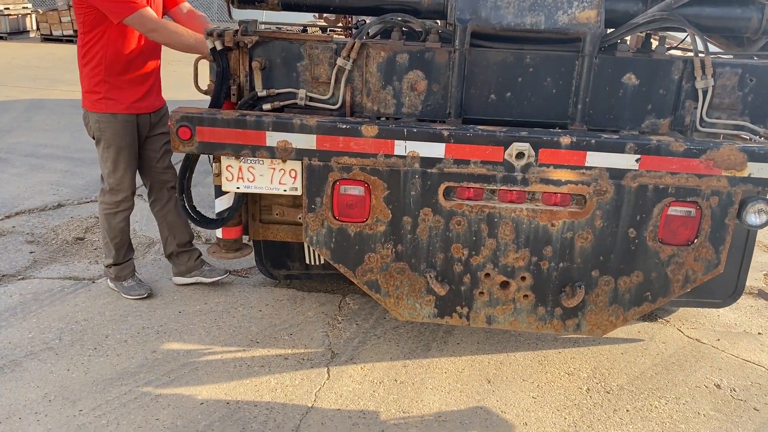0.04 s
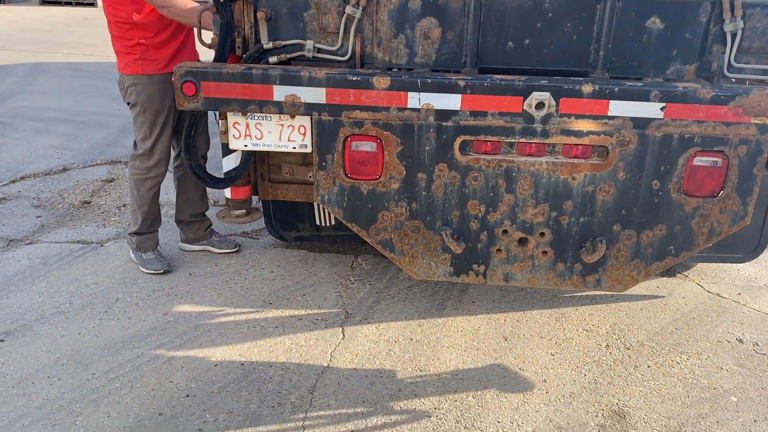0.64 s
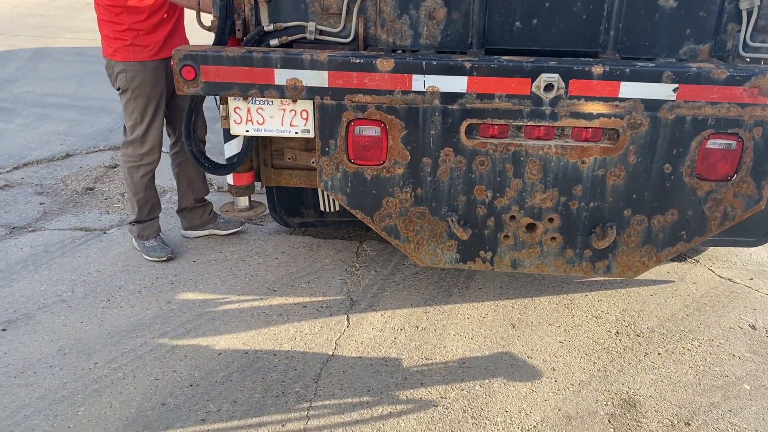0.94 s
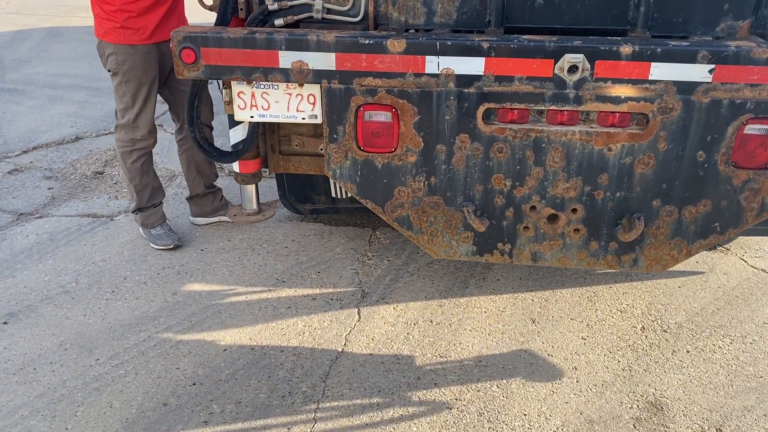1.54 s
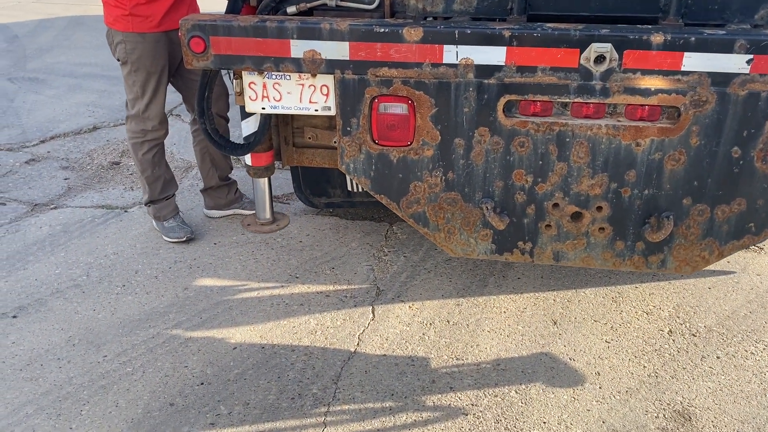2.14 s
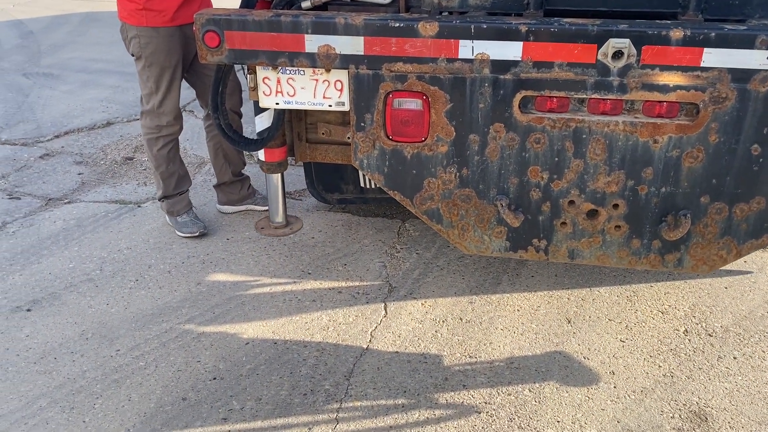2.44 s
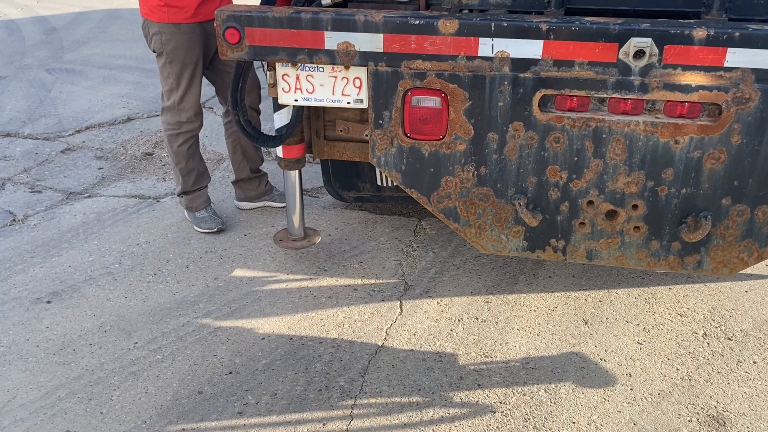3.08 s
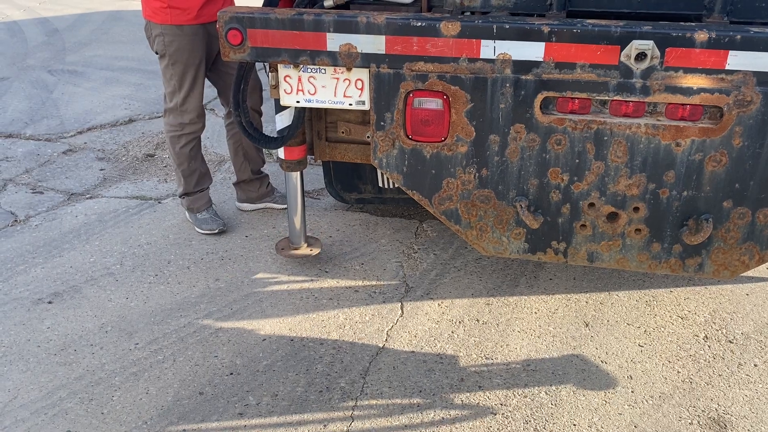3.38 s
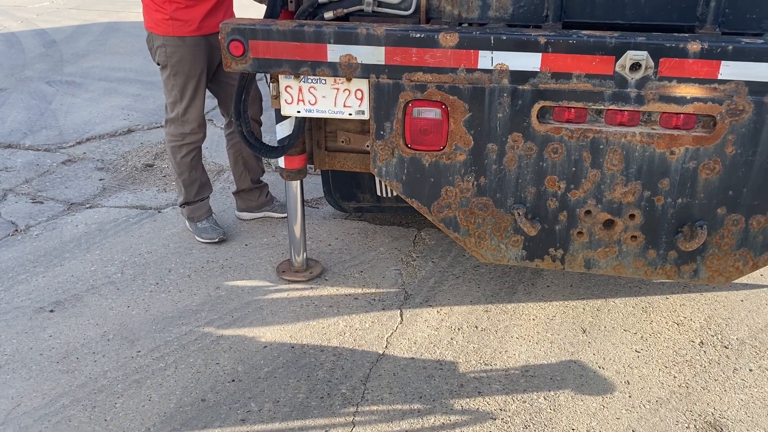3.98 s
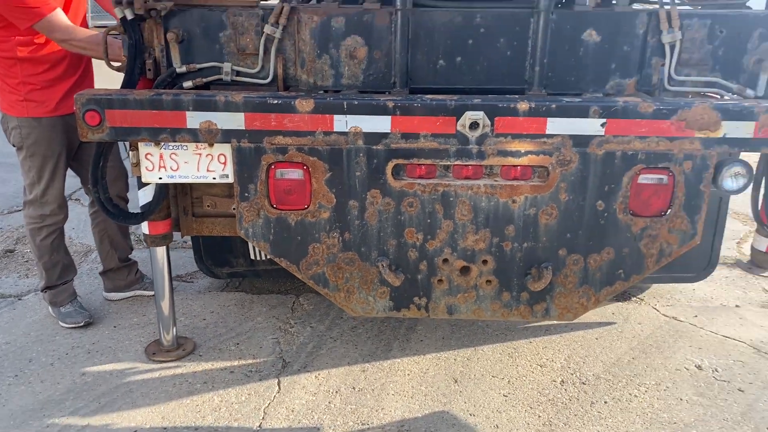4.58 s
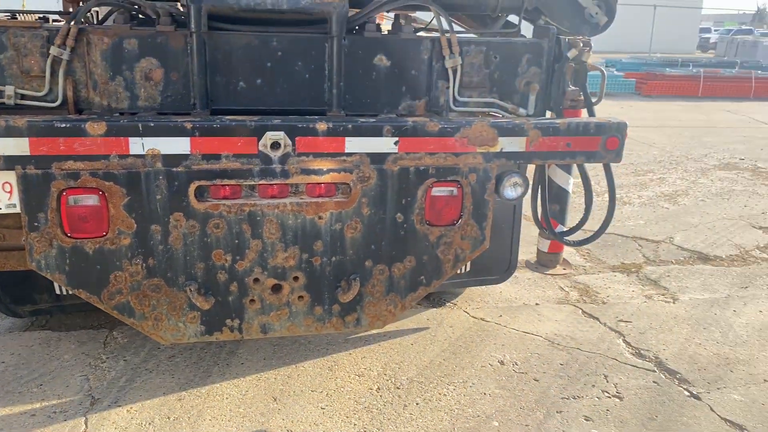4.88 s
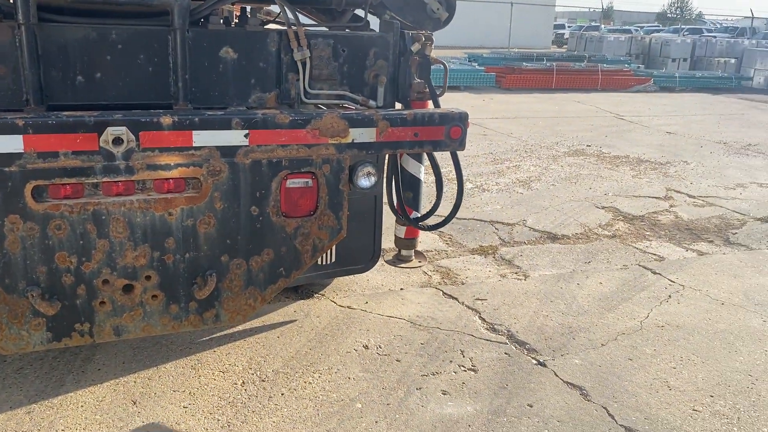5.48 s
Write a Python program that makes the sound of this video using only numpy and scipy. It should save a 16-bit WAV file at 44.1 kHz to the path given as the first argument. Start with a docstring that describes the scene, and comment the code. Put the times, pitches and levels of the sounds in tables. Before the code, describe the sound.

A diesel truck idles outdoors while hydraulics hum, whistle and squeal, raising a steel outrigger leg that clunks home.

```python
"""A six-cylinder diesel truck idles on an open concrete yard, a stereo microphone standing behind it.
The tailpipe puffs, the block drones and clatters, and the crane's outrigger leg is pulled up:
the gear pump hums under load while oil whistles, squeals and hisses through the control valve.
The microphone comes close to the leg's side; the steel leg clunks home and the valve squeals shut.
The microphone draws back, the unloaded pump whines and the engine idles on."""
import sys
import numpy as np
from scipy import signal
from scipy.fft import rfft, irfft, next_fast_len
from scipy.io import wavfile
from scipy.ndimage import uniform_filter1d, map_coordinates

SR = 44100
rng = np.random.default_rng(int(sys.argv[2]) if len(sys.argv) > 2 else 0)


def store_wav(level_fs):
    """Save 16-bit WAV to argv[1]."""
    pcm = np.round(np.clip(np.atleast_2d(level_fs), -1, 1) * 32767)
    wavfile.write(sys.argv[1], SR, pcm.T.astype(np.int16))


N = 243431
TIME = np.arange(N) / SR
BINS = np.fft.rfftfreq(N, 1 / SR)
OPEN_S, SHUT_S = 0.54, 4.51  # the lever holds the valve open while the leg rises
TEETH_PER_FIRING = 2.452  # the pump is geared to the engine

# engine speed: [t/s, firing rate/Hz]
FIRING_RATE = [(0, 60.05), (.5, 59.95), (.85, 59.75), (3.5, 59.9), (4.3, 59.8), (4.7, 60.05), (5.5, 60.1)]
# exhaust note: [multiple of the four-stroke cycle, relative level/dB]
EXHAUST_ORDERS = [(4, -56), (5, -43), (6, -20), (7, -35), (8, -34.5), (9, -32), (11, -52.5), (12, -32),
                  (14, -43), (18, -36), (20, -43.5), (22, -42), (24, -41)]
# the tailpipe as it reaches the microphone: [t/s, gain/dB]
TAILPIPE_GAIN = [(0, -1.5), (1.1, -1), (2.2, -0.7), (3.2, -0.6), (4.1, 0.5), (4.6, -1.3), (5.3, -2)]
# spectrum of the block's drone: [f/Hz, relative level/dB]
DRONE_SPECTRUM = [(20, -33), (45, 5.5), (100, 6.5), (170, 4.5), (260, 3.5), (380, -5.5), (500, -0.5),
                  (650, -6), (820, -3), (1100, -6), (1500, -11), (2200, -25), (5000, -34.5)]
# spectrum of the diesel clatter: [f/Hz, relative level/dB]
CLATTER_SPECTRUM = [(500, -55), (1500, -9.5), (1900, -7.5), (2400, -4), (2800, -2), (3100, -0.5),
                    (3500, -5), (4500, -15), (5600, -12), (8200, -17.5), (11000, -19.5), (12500, -22),
                    (15500, -60)]
# engine treble at the microphone: [t/s, clatter level/dB, covers level/dB]
ENGINE_TREBLE = [(0, -37, -37.5), (.6, -34, -36.5), (1.7, -35, -35.5), (2.45, -36, -33.5),
                 (3.6, -35, -36.5), (4.45, -35, -34.5), (5.15, -41, -40.5), (5.52, -39.5, -34.5)]
# ringing engine covers: [f/Hz, width/Hz, relative level far/dB, relative level close/dB]
COVER_MODES = [(1734, 51, 3, -2), (1815, 40, -2.5, 1.5), (1986, 240, -5, -4), (2120, 53, -0.5, -4.5),
               (2196, 59, -4, 0.5), (2710, 128, -5, -4.5), (4110, 51, -7.5, -9.5)]
# belt-driven parts: [f/Hz, level far/dB, level close/dB]
BELT_TONES = [(319.5, -48, -48), (628.6, -50, -45.5), (813, -49, -43)]
# swells of a narrow whine: [start/s, end/s, level/dB]
WHINE_SWELLS = [(.7, 1.05, -46), (1.53, 1.78, -42.5), (2.8, 3.55, -40), (4.64, 5.05, -39.5)]
# pump hum: [multiple of the tooth rate, relative level/dB, left minus right/dB]
PUMP_HARMONICS = [(1, -41.5, 1), (2, -33, -1), (3, -51, 2), (4, -52, -2), (5, -37, 5.5)]

# the valve's main whistle while the leg travels: [t/s, f/Hz, relative level/dB, octave/dB]
MAIN_JET = [(0.93, 5680, -37, -46), (.98, 5630, -35.5, -46), (1.12, 5635, -37, -48), (1.2, 5710, -43, -41),
            (1.3, 5790, -50, -39.5), (1.37, 5910, -41, -51), (1.54, 5950, -36.5, -43.5),
            (1.94, 5890, -37.5, -44), (1.96, 6030, -38, -44), (1.99, 5975, -35, -40),
            (2.35, 5965, -34.5, -38.5), (2.49, 5890, -38, -40), (2.58, 5950, -33.5, -39),
            (2.69, 5980, -34, -40), (2.77, 6120, -34, -38.5), (2.91, 6105, -35.5, -38.5),
            (2.96, 6240, -41, -50), (3.09, 6350, -43, -47), (3.125, 5970, -41, -50), (3.16, 6300, -40, -49),
            (3.195, 6000, -39, -45), (3.215, 6500, -54, -52), (3.24, 6300, -40, -44), (3.3, 6240, -40, -45),
            (3.335, 6486, -54, -48), (3.36, 5980, -41, -46), (3.4, 5960, -41, -47), (3.44, 6100, -37, -42),
            (3.47, 5950, -47, -46), (3.56, 6000, -41.5, -50), (3.68, 5920, -44, -47), (3.8, 6020, -39, -43)]
# low whistle as the spool opens: [t/s, f/Hz, relative level/dB, octave/dB, third harmonic/dB]
LOW_JET_OPENING = [(.52, 3600, -66, -68, -70), (.56, 5050, -64, -66, -70), (.66, 4700, -58, -54, -62),
                   (.72, 4500, -49, -50, -58), (.78, 4500, -48, -47, -52), (.85, 4520, -42, -48, -55),
                   (.92, 4530, -51, -51, -55)]
# low whistle in steady flow: [t/s, f/Hz, relative level/dB, octave/dB, third harmonic/dB]
LOW_JET_STEADY = [(.95, 4410, -43, -31, -47), (1.05, 4380, -41, -33, -45), (1.12, 4355, -40, -45, -45),
                  (1.25, 4500, -37.5, -49, -45), (1.36, 4500, -45, -37, -47), (1.48, 4535, -39, -37, -52),
                  (1.7, 4548, -52, -35, -47), (2.1, 4555, -50, -37.5, -48), (2.35, 4540, -48, -35, -48),
                  (2.47, 4545, -54, -34, -49), (2.56, 4590, -48, -31.5, -47), (2.66, 4590, -52, -32.5, -48),
                  (2.77, 4640, -44, -30.5, -46), (2.95, 4615, -43, -32.5, -46), (3.12, 4690, -49, -34, -48),
                  (3.2, 4690, -45, -35, -51), (3.3, 4760, -52, -37, -46), (3.36, 4850, -55, -45, -46),
                  (3.41, 4760, -52, -37, -45), (3.58, 4730, -50, -36, -48), (3.76, 4853, -51, -41, -46),
                  (3.84, 5060, -48, -46, -43), (3.91, 4880, -52, -41, -48), (3.99, 5010, -50, -43, -45),
                  (4.07, 4830, -53, -43, -50)]
# low whistle as the spool closes: [t/s, f/Hz, relative level/dB, octave/dB, third harmonic/dB]
LOW_JET_CLOSING = [(4.128, 5550, -54, -46, -62), (4.169, 4900, -60, -49, -58), (4.2, 5820, -58, -47, -62),
                   (4.226, 4840, -52, -39, -46), (4.28, 4590, -38, -50, -50), (4.33, 4940, -46, -33.5, -54),
                   (4.37, 4930, -39, -43, -52), (4.39, 4930, -54, -58, -62)]
# spells of spool chatter: [start/s, end/s, depth 0-1]
SPOOL_CHATTER = [(.66, .94, 1), (1.4, 1.98, .7), (3.07, 3.65, .5), (3.85, 4.42, .7)]
# faint side jets: [start/s, end/s, multiple of the low whistle, level/dB, roughness 0-1]
SIDE_JETS = [(.93, 3.1, 1.62, -55, .35), (1.3, 2.3, 1.81, -50.5, .15), (.93, 1.45, 2.76, -54, .4),
             (1.4, 2.35, 3.21, -53, .45), (.93, 3.65, 3.36, -55, .5)]
# squeals at the valve's other edges:
# [start/s, length/s, first f/Hz, middle f/Hz, last f/Hz, relative level/dB, octave/dB, roughness 0-1]
EDGE_SQUEALS = [(.528, .03, 4700, 5900, 6900, -39.5, -43, .5),
                (.553, .05, 6950, 6500, 6330, -38.5, -50, .3), (.545, .06, 6250, 6400, 6300, -43, -50, .3),
                (.615, .05, 6520, 6330, 5950, -43, -52, .35), (.6, .06, 5470, 5170, 5100, -44, -49, .4),
                (.66, .06, 5850, 5570, 5700, -41.5, -47, .4), (.715, .11, 5730, 5830, 5750, -42, -43.5, .4),
                (.675, .085, 5150, 5330, 5200, -42, -47.5, .4),
                (.66, .18, 7550, 7030, 7300, -46.5, -49, .6), (.835, .09, 7280, 7430, 7620, -48, -45, .25),
                (.76, .17, 5500, 5530, 5760, -48, -44, .6), (3.09, .05, 6400, 6800, 7000, -45, -51, .45),
                (3.183, .045, 7080, 6680, 6450, -42, -52, .35),
                (3.35, .05, 6500, 6880, 6900, -42, -51, .35), (3.405, .07, 6750, 6800, 6400, -42, -50, .35),
                (3.455, .18, 7000, 6580, 6950, -42, -50, .4), (3.46, .17, 6450, 6250, 6300, -50, -49, .35),
                (3.355, .275, 5560, 5640, 5560, -57, -48, .6), (3.51, .1, 5350, 5330, 5300, -50, -62, .5),
                (3.8, .09, 4400, 4220, 4280, -46, -43, .35), (3.89, .2, 4330, 4350, 4380, -46, -43.5, .9),
                (3.8, .09, 6250, 6370, 6380, -45, -47, .35), (3.89, .19, 6400, 6420, 6480, -44.5, -47, .9),
                (4.108, .055, 7750, 6680, 6680, -37.5, -49, .3),
                (4.18, .035, 6550, 6700, 6500, -42, -56, .6),
                (4.21, .03, 6200, 5820, 5680, -37.5, -52, .25),
                (4.248, .02, 5250, 4950, 4700, -42, -50, .35),
                (4.262, .046, 4690, 4570, 4530, -35.5, -42, .2),
                (4.255, .06, 6150, 5950, 5900, -46, -54, .6),
                (4.295, .085, 4430, 4480, 4610, -50, -38, .25), (4.38, .04, 4620, 4700, 4250, -52, -43, .4)]
# screeches of the half-open spool: [start/s, end/s, level/dB, octave/dB]
SPOOL_SCREECHES = [(.55, .68, -52, -50), (.67, .94, -48, -45), (.75, .83, -50, -43), (3.36, 3.63, -54, -51),
                   (3.89, 4.08, -53, -51), (4.07, 4.15, -51, -46)]
# surges of turbulent oil: [start/s, end/s, relative level/dB]
OIL_SURGES = [(.53, .95, -47), (.73, .85, -43), (.95, 3.9, -54), (3.1, 3.62, -49), (3.88, 4.41, -46),
              (4.06, 4.15, -41.5), (4.36, 4.52, -51)]
# hiss of the open valve: [f/Hz, relative level/dB]
FLOW_SPECTRUM = [(2000, -25), (4200, -3), (5500, -2.5), (7500, .5), (9000, -.5), (11500, -.5),
                 (13500, -1.5), (15500, -1.5)]
# hiss of oil returning to the tank: [f/Hz, relative level/dB]
RETURN_SPECTRUM = [(1500, -12), (2700, 10.5), (3500, 8.5), (4300, 4), (5200, -6), (7500, -10.5),
                   (11000, -36), (15000, -16)]
# the leg knocks home: [t/s, strength/dB, hardness as cutoff f/Hz]
LEG_KNOCKS = [(4.067, -28, 526), (4.083, -16.5, 200), (4.088, -21.5, 800), (4.172, -23.5, 400),
              (4.197, -25, 350)]
# modes of the steel leg: [f/Hz, relative level/dB, t60/s]
LEG_MODES = [(80.4, -9, 0.067), (135.6, -6, 0.098), (240.6, -1.5, 0.14), (344, 0, 0.075), (458, 2, 0.059),
             (540, 0.5, 0.052), (640, -16, 0.12), (1320, -12, .05)]

# two wind or handling bumps on the microphone, then the leg's thud: [t/s, length/s, level/dB]
RUMBLES = [(0.796, 0.15, -23.5), (1.474, 0.3, -25), (4.084, 0.057, -19)]
# likeness of the engine at the microphone's two ports: [f/Hz, correlation]
ENGINE_LIKENESS = [(60, 1), (250, 0.86), (500, 0.7), (900, 0.54), (1400, -0.36), (2200, 0.34),
                   (3100, -0.04), (7000, 0), (15000, -0.3)]
# the engine's balance at the microphone: [f/Hz, left minus right/dB]
ENGINE_BALANCE = [(60, 1.3), (130, 2.4), (280, 0.59), (550, 4.3), (1100, 2.4), (3000, 0.55), (15000, 0.5)]
# the valve's balance at the microphone: [f/Hz, left minus right/dB]
VALVE_BALANCE = [(4500, 1), (6000, 8.5), (7500, -3), (9000, 3.5), (15000, -2)]
# the valve's phase between the ports: [f/Hz, left lead/rad]
VALVE_LEAD = [(800, 1.5), (4500, 1.76), (6000, 1), (7300, 0), (8200, 2), (8750, 3.35), (9080, 3.05),
              (9200, 2.75), (9650, 2.4), (10300, 1.5), (11900, -1.1), (13400, -3.5), (14500, -5),
              (15500, -5)]


def exhaust(firings, unsteady=0.057, dispersion=0.5):
    """Six puffs a cycle, smeared by the pipe; unequal cylinders add orders between firing harmonics."""
    out = np.zeros((2, N))
    for order, db in EXHAUST_ORDERS:
        harmonic = order / 6
        shift = dispersion * (harmonic - 1) ** 2 if order % 3 == 0 else 2 * np.pi * rng.random()
        tone = np.cos(2 * np.pi * harmonic * firings + shift) * (1 + unsteady * harmonic * drift(15))
        out += np.sqrt(2) * gain_of(db) * tone * sides(at_hz(ENGINE_BALANCE, order * 10))
    return out * gain_of(curve(TAILPIPE_GAIN)[0])


def engine(firings, ripple_db=2):
    """The block's low drone, diesel clatter in its many close modes, and the ringing covers."""
    clatter_gain, covers_gain = gain_of(curve(ENGINE_TREBLE))
    ripple = uniform_filter1d(uniform_filter1d(rng.standard_normal(len(BINS)), 160), 120)
    clatter_db = at_hz(CLATTER_SPECTRUM, BINS) + ripple_db * unit_rms(ripple)
    drone = engine_at_mic(combustion(firings, repeat=0.62, depth=0.065), at_hz(DRONE_SPECTRUM, BINS))
    clatter = engine_at_mic(combustion(firings, repeat=0.38, depth=0.21), clatter_db)
    drone_gain = by_load(idle_db=-30.5, loaded_db=-29.5)
    return drone_gain * drone + clatter_gain * clatter + covers_gain * covers()


def combustion(firings, repeat, depth, size=4416):
    """Noise that swells at each firing; the share `repeat` comes back alike in every engine cycle."""
    place = firings / 6 % 1 * size
    patterns = rng.standard_normal((2, size))
    alike = unit_rms(np.array([map_coordinates(p, [place], order=3, mode="grid-wrap") for p in patterns]))
    noise = np.sqrt(repeat) * alike + np.sqrt(1 - repeat) * rng.standard_normal((2, N))
    return noise * (1 + depth * np.cos(2 * np.pi * firings) + 0.06 * np.cos(np.pi * firings))


def covers(rattle_db=2.4, wander=.004):
    """Each engine cover rings in its own narrow band, in uneven bursts."""
    out = np.zeros((2, N))
    for hz, width, far_db, close_db in COVER_MODES:
        phase = 2 * np.pi * np.cumsum(hz * (1 + wander * drift(8))) / SR
        cos, sin = np.cos(phase), np.sin(phase)
        ring = np.array([drift(width / 2) * cos + drift(width / 2) * sin for _ in range(2)])
        out += ring * np.sqrt(width) * by_distance(far_db, close_db) * gain_of(rattle_db * drift(12.2))
    return engine_at_mic(out, 0)


def engine_at_mic(pair, colour_db):
    """Colours two unrelated signals; the ports share the bass and hear the scattered treble apart."""
    left, other = rfft(pair)
    likeness = at_hz(ENGINE_LIKENESS, BINS)
    right = likeness * left + np.sqrt(1 - likeness ** 2) * other
    spectrum = np.array([left, right]) * sides(at_hz(ENGINE_BALANCE, BINS)) * gain_of(colour_db)
    return unit_rms(irfft(spectrum, N))


def pump(firings, ripple=0.12):
    """Pressure pulses of the gear teeth, a hum that is loud only under load."""
    teeth = 2 * np.pi * TEETH_PER_FIRING * firings
    hum = sum(sides(side_db) * gain_of(db) * np.sin(k * teeth + 2 * np.pi * rng.random())
              for k, db, side_db in PUMP_HARMONICS)
    return np.sqrt(2) * hum * by_load(idle_db=-11.5, loaded_db=-1) * (1 + ripple * drift(11))


def valve(firings, main_db=1, low_db=-0.6):
    """Two whistles and faint side jets, which wobble and sputter when the spool chatters."""
    chatter = sum(depth * gate(start, end, 0.04) for start, end, depth in SPOOL_CHATTER)
    shake = 1 + oil_pressure(firings) + .007 * chatter * drift(28)
    eddies = dict(jitter=.0022 + .006 * chatter, flicker_db=.9 + 1.8 * chatter, fuzz=.13)
    main_hz, *levels_db = curve(MAIN_JET)
    main = whistle(MAIN_JET[0][0], MAIN_JET[-1][0], main_hz * shake, levels_db, rasp=0.12, **eddies)
    low_jet = [*LOW_JET_OPENING, *LOW_JET_STEADY, *LOW_JET_CLOSING]
    low_hz, *levels_db = curve(low_jet)
    low = whistle(low_jet[0][0], low_jet[-1][0], low_hz * shake, levels_db, rasp=0.16, **eddies)
    out = gain_of(main_db) * main + gain_of(low_db) * low
    for start, end, ratio, db, rough in SIDE_JETS:
        out += whistle(start, end, ratio * low_hz * shake, [db], jitter=.016 * rough,
                       rasp=.4 * rough, flicker_db=3, wander=.007 * rough)
    return out


def oil_pressure(firings, wander=0.00223, throb=0.0023, ripple=.0015):
    """Relative pitch shake of the valve's whistles: turbulence, engine throb and pump ripple."""
    teeth = 2 * np.pi * TEETH_PER_FIRING * firings
    return wander * drift(22) + throb * np.sin(np.pi * firings) + ripple * np.sin(2 * teeth)


def whistle(start, end, hz, harmonics_db, jitter, rasp, flicker_db=2, wander=0, fuzz=0, fade_s=0.0032):
    """An oil jet sings at an edge; eddies shake its pitch and break up its level."""
    span = slice(round(start * SR), round(end * SR))
    t, hz, jitter, flicker_db, *harmonics_db = (
        np.broadcast_to(v, N)[span] for v in (TIME, hz, jitter, flicker_db, *harmonics_db))
    hz = hz * (1 + wander * drift(37.7, len(t)))
    phase = 2 * np.pi * np.cumsum(hz * (1 + jitter * drift(520, len(t)))) / SR
    strength = gain_of(flicker_db * drift(40, len(t))) * (1 + rasp * drift(300, len(t)))
    strength *= np.sqrt(2) * np.clip(np.minimum(t - start, end - t) / fade_s, 0, 1)
    out = np.zeros((2, N))
    strongest_db = np.max(harmonics_db, 0)
    for k, db in enumerate(harmonics_db, 1):
        partial_hz = k * hz
        weak = np.clip((strongest_db - db) / 15, 0, 1)  # weak partials come and go, and fray
        gain = gain_of(db + 2.5 * weak * drift(18, len(t))) * (partial_hz < SR / 2)
        fray = (fuzz + .3 * weak) * drift(550, len(t))
        lead = np.array([[.5], [-.5]]) * at_hz(VALVE_LEAD, partial_hz)
        balance = sides(at_hz(VALVE_BALANCE, partial_hz))
        balance /= np.sqrt((balance ** 2).mean(0))
        out[:, span] += strength * balance * gain * np.sin(k * phase + lead + fray)
    return out


def squeals(gain_db=1):
    """Short, rough jets at the valve's other edges, each one arched glide."""
    out = np.zeros((2, N))
    for start, length, first_hz, middle_hz, last_hz, db, octave_db, rough in EDGE_SQUEALS:
        arch = np.polyfit([0, .5, 1], [first_hz, middle_hz, last_hz], 2)
        hz = np.polyval(arch, np.clip((TIME - start) / length, 0, 1))
        out += whistle(start, start + length, hz, [db, octave_db, octave_db - 7], jitter=.016 * rough,
                       rasp=.4 * rough, flicker_db=3 * rough, wander=.014 * rough, fuzz=.55 * rough)
    return gain_of(gain_db) * out


def screech(jets=4, low_hz=4300, high_hz=7400, wander=.018):
    """Ragged jets spread over the treble wander and sputter while the spool is half open."""
    out = np.zeros((2, N))
    for start, end, db, octave_db in SPOOL_SCREECHES:
        for hz in np.geomspace(low_hz, high_hz, jets):
            out += whistle(start, end, hz * (1 + wander * rng.standard_normal()), [db, octave_db],
                           jitter=.011, rasp=.3, flicker_db=4, wander=wander, fuzz=.35)
    return out / np.sqrt(jets)


def leg(rattle=0.3, rattle_s=.03):
    """Steel on steel, left of centre: a blow and a rattle ring the leg, soft blows only its low modes."""
    out, t = np.zeros(N), TIME[:SR // 2]
    for start, strength_db, hard_hz in LEG_KNOCKS:
        ring = sum(gain_of(db - 60 * t / t60) * np.sin(2 * np.pi * hz * t)
                   / np.hypot(1, (hz / hard_hz) ** 2) for hz, db, t60 in LEG_MODES)
        blow = rattle * rng.standard_normal(len(t)) * np.exp(-t / rattle_s) / np.sqrt(rattle_s * SR / 2)
        blow[0] += 1
        add(out, start, gain_of(strength_db) * signal.fftconvolve(blow, ring))
    return out * sides(2.5)


def oil(surge_db=.5, sputter_db=.6, before_db=-40, after_db=-37, ramp_s=0.23):
    """Oil hisses in surges through the open valve, and back to the tank when it is centred."""
    flow = np.sqrt(swell_power(OIL_SURGES, ramp_s=.08)) * gain_of(surge_db + sputter_db * drift(90))
    before = gain_of(before_db) * np.clip((OPEN_S - TIME) / ramp_s + .5, 0, 1)
    after = gain_of(after_db) * np.clip((TIME - SHUT_S) / ramp_s + 0.16, 0, 1)
    return hiss(FLOW_SPECTRUM) * flow + hiss(RETURN_SPECTRUM) * (before + after)


def free_pump(hz=787, db=-41.5, wander=0.0204):
    """A wavering whine once the load is off the pump."""
    return whistle(SHUT_S, N / SR, hz * (1 + wander * drift(25.6)), [db], jitter=0.019, rasp=0.17)


def belt_parts(firings, waver=0.6, throb=0.79, swell_db=2):
    """Faint wavering tones of the belt-driven parts, throbbing with each engine cycle."""
    out = np.zeros((2, N))
    for hz, far_db, close_db in BELT_TONES:
        pulse = 1 + throb * np.cos(2 * np.pi * (firings / 6 + rng.random()))
        envelope = unit_rms(pulse * gain_of(swell_db * drift(6)))
        tone = np.sqrt(2) * np.sin(2 * np.pi * hz * TIME + waver * drift(6.5))
        out += sides(at_hz(ENGINE_BALANCE, hz)) * by_distance(far_db, close_db) * envelope * tone
    return out


def whine(hz=3343.5, base_db=-47, waver=0.52, flicker_db=2):
    """One narrow whine flickers and swells in the background."""
    tone = np.array([np.sin(2 * np.pi * hz * TIME + waver * drift(9.8)) for _ in range(2)])
    level = np.sqrt(gain_of(base_db) ** 2 + swell_power(WHINE_SWELLS, ramp_s=0.16))
    return level * unit_rms(tone * gain_of(flicker_db * drift(40)))


def rumbles(centre_hz=75):
    """Low wind or handling bumps on the microphone, and the leg's thud: short swells of deep noise."""
    band = 1 / (1 + (BINS / centre_hz - centre_hz / (BINS + 1)) ** 2)
    noise = unit_rms(irfft(rfft(rng.standard_normal(N)) * band, N))
    return noise * sum(gain_of(db) * np.cos(np.pi * np.clip((TIME - peak_s) / length, -.5, .5)) ** 2
                       for peak_s, length, db in RUMBLES)


def hiss(spectrum):
    """Turbulent noise, unrelated at the two ports."""
    return unit_rms(irfft(rfft(rng.standard_normal((2, N))) * gain_of(at_hz(spectrum, BINS)), N))


def by_load(idle_db, loaded_db):
    """A gain that moves from its idle to its loaded value while the valve is open."""
    return gain_of(idle_db + (loaded_db - idle_db) * gate(OPEN_S, SHUT_S, ramp_s=0.076))


def by_distance(far_db, close_db):
    """A gain that changes as the microphone comes close to the leg's side and draws back."""
    return gain_of(far_db + (close_db - far_db) * gate(1.68, 4.46, ramp_s=0.35))


def swell_power(rows, ramp_s):
    """Summed power of stretches that ramp in and out."""
    return sum((gain_of(db) * gate(start, end, ramp_s)) ** 2 for start, end, db in rows)


def gate(start, end, ramp_s):
    """One between two times, zero outside, with straight ramps centred on the edges."""
    return np.clip(np.minimum(TIME - start, end - TIME) / ramp_s + .5, 0, 1)


def drift(rate_hz, count=N):
    """Smooth random motion of rms one, up to about rate_hz."""
    size = next_fast_len(max(count, SR) // 8 + 1)  # drawn at an eighth of the sample rate
    hz = np.fft.rfftfreq(size, 8 / SR)
    slow = irfft(rfft(rng.standard_normal(size)) / (1 + (hz / rate_hz) ** 4), size)
    return np.interp(np.arange(count) / 8, np.arange(size), unit_rms(slow))


def curve(rows):
    """Each column of a table, joined by straight lines in time."""
    times, *columns = np.transpose(rows)
    return [np.interp(TIME, times, column) for column in columns]


def at_hz(rows, hz):
    """A table read on a log-frequency axis."""
    f, value = np.transpose(rows)
    return np.interp(np.log(hz + 1), np.log(f + 1), value)


def sides(db):
    """Left and right gains for a level difference."""
    return gain_of(np.array([[.5], [-.5]]) * db)


def gain_of(db):
    """Decibels to amplitude."""
    return 10 ** (np.asarray(db) / 20)


def unit_rms(x):
    """Scales to an rms of one."""
    return x / np.sqrt(np.mean(x ** 2) + 1e-20)


def add(mix, start, sound):
    """Mixes a sound in at a time."""
    part = mix[..., round(start * SR):][..., :sound.shape[-1]]
    part += sound[..., :part.shape[-1]]


def scene():
    """The yard from behind the truck: engine and hydraulics share one running count of firings."""
    firings = .47 + np.cumsum(curve(FIRING_RATE)[0]) / SR
    truck = exhaust(firings) + engine(firings) + belt_parts(firings) + whine()
    bumps = rumbles()
    hydraulics = pump(firings) + free_pump() + valve(firings) + squeals() + screech() + oil()
    return truck + hydraulics + leg() + bumps


def record(dry):
    """The recorder's band limit, 15.8 kHz."""
    lowpass = signal.firwin(511, 15800, window=("kaiser", 9), fs=SR)
    return signal.oaconvolve(dry, lowpass[None], "same")


dry = scene()
out = record(dry)
store_wav(out)
```